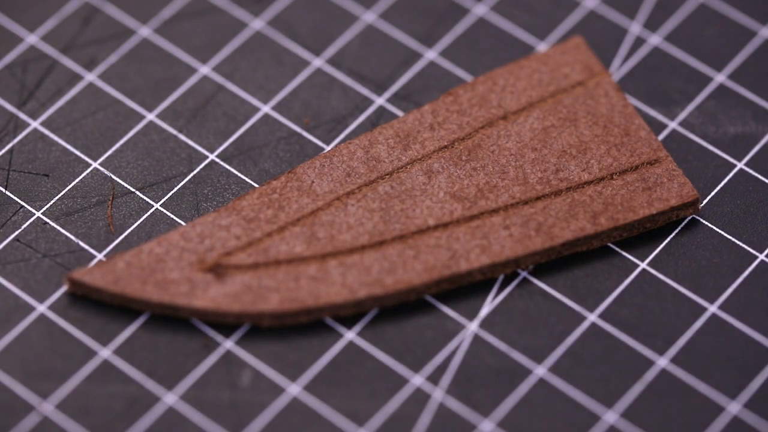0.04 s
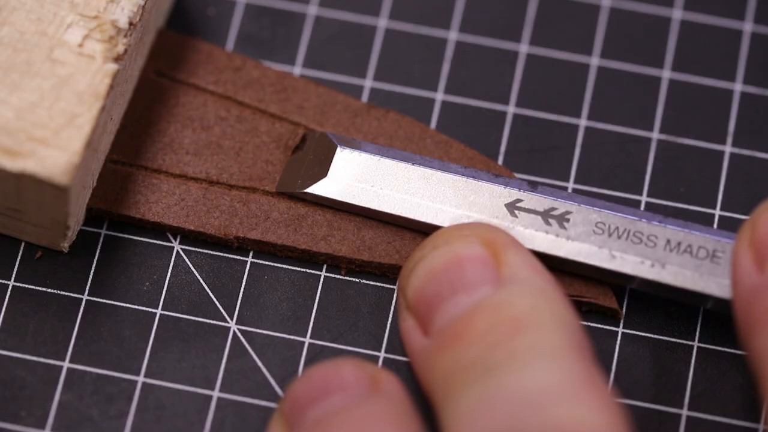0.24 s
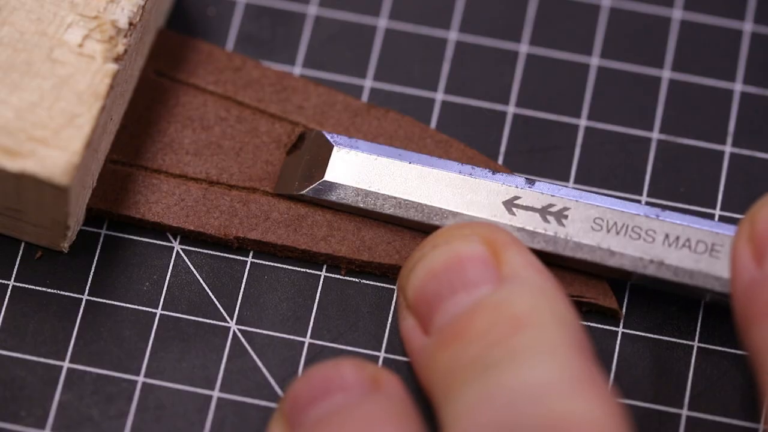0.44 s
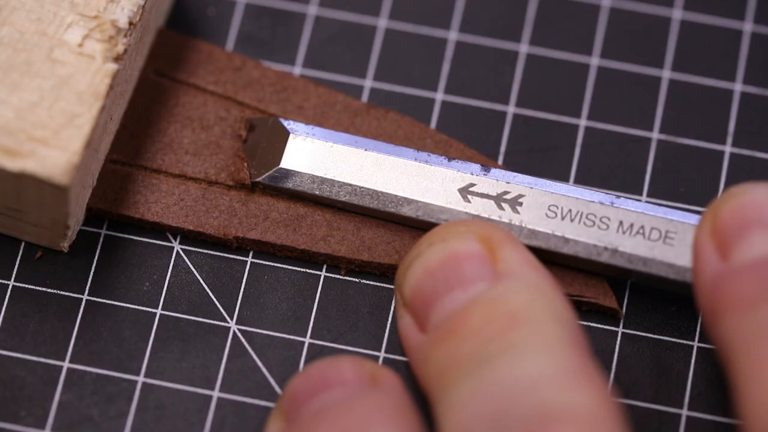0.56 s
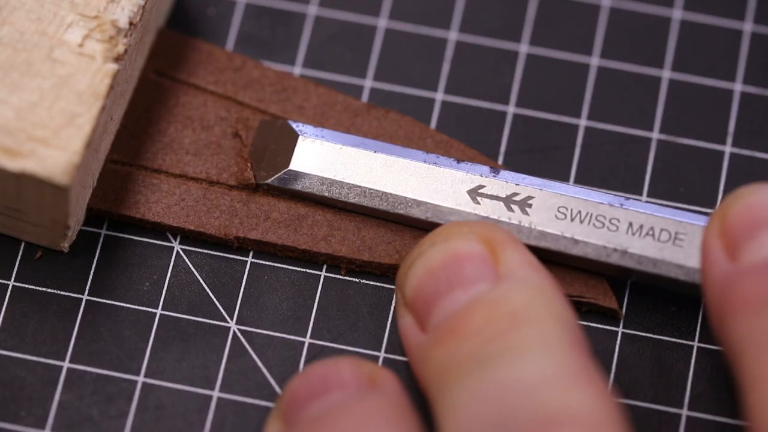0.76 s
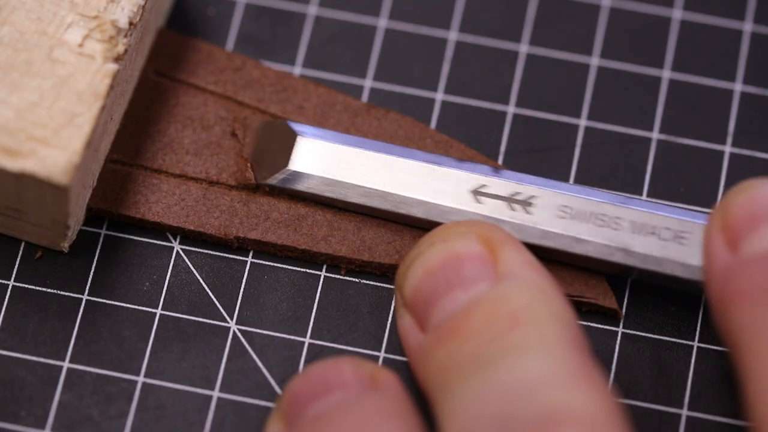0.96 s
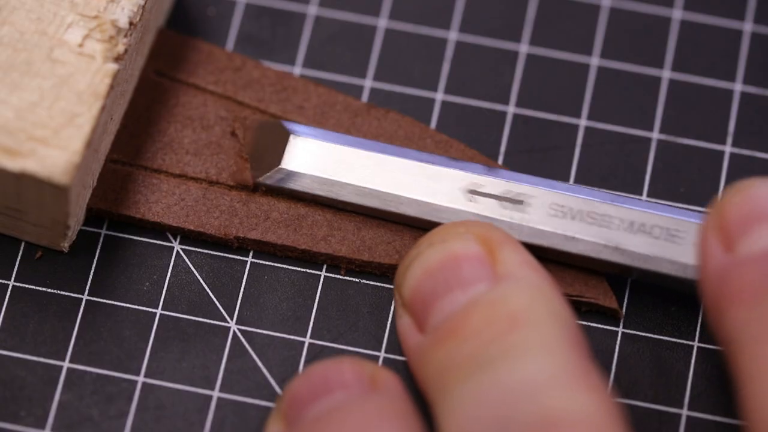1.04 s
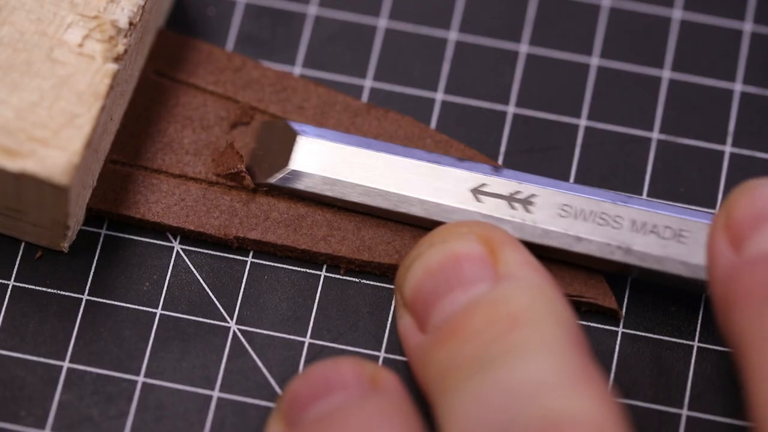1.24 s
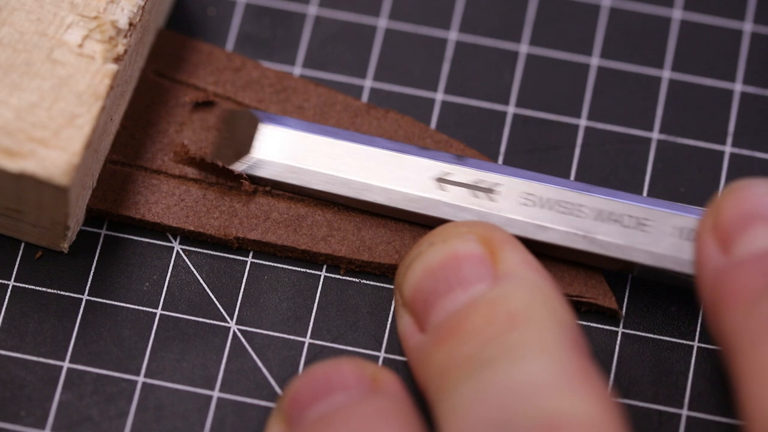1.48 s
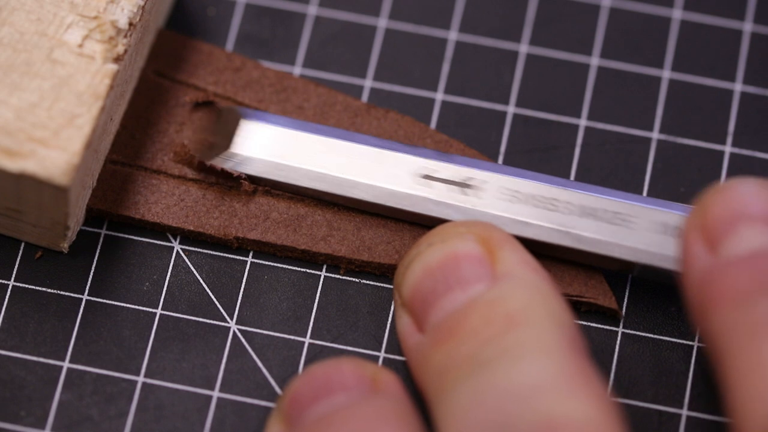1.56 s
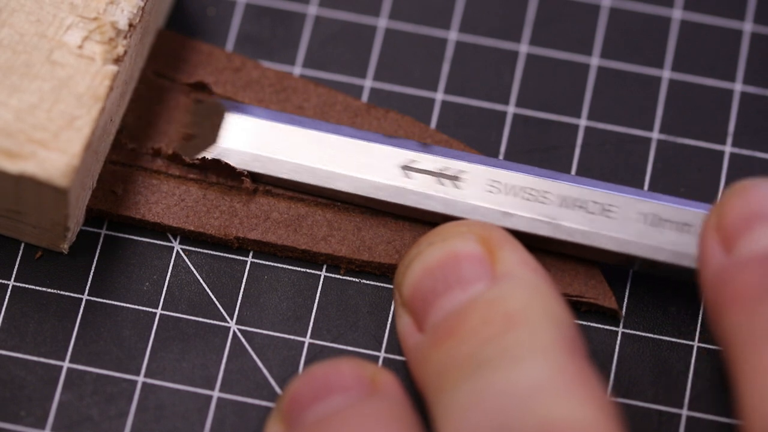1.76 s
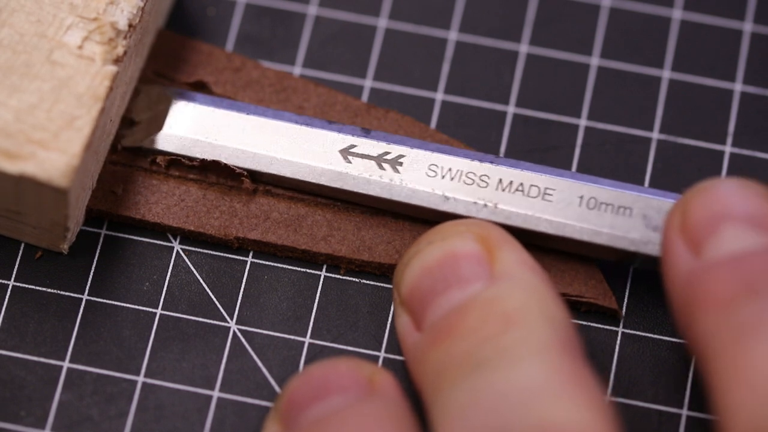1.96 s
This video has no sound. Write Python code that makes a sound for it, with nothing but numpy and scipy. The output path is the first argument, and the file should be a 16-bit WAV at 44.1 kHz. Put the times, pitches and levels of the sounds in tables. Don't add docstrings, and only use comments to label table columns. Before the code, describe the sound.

Close stereo pickup of a steel blade pushed through leather: hands shift and bump the bench, then brief crisp tearing strokes grow stronger, each with a metallic edge and woody thump, over faint room hiss.

```python
import sys
import numpy as np
from scipy import signal
from scipy.fft import rfft, irfft, next_fast_len
from scipy.io import wavfile
from scipy.ndimage import uniform_filter1d

SR = 44100
rng = np.random.default_rng(int(sys.argv[2]) if len(sys.argv) > 2 else 0)


def undo_db(level):
    steps = np.asarray(level, float) / 20
    return 10 ** steps


def put_to_file(sound):
    columns = np.atleast_2d(sound).T
    safe = np.clip(columns, -1, 1)
    whole_steps = np.round(safe * 32767)
    wavfile.write(sys.argv[1], SR, whole_steps.astype(np.int16))


N = 88905


def evened(x):
    return x / np.sqrt(np.mean(x ** 2) + 1e-20)


def read(points, hz):
    f, value = np.transpose(points)
    return np.interp(np.log(hz + 1), np.log(f + 1), value)


def colour(x, points):
    db = read([(0, -100)] + list(points), np.fft.rfftfreq(4096, 1 / SR))
    log_gain = np.log(undo_db(np.maximum(db, -100)))
    mirrored = np.r_[log_gain, log_gain[-2:0:-1]]
    answer = np.fft.ifft(np.exp(np.conj(signal.hilbert(mirrored)))).real[:2048]
    return signal.oaconvolve(x, answer / np.linalg.norm(answer))[:len(x)]


def ring(x, hz, width):
    r = np.exp(-np.pi * width / SR)
    turning = signal.lfilter([1], [1, -r * np.exp(2j * np.pi * hz / SR)], x)
    return 2 * np.sqrt(1 - r) * turning.imag * np.sqrt(2)


def soften(x, hz):
    return signal.lfilter(*signal.butter(2, min(hz, SR / 3), fs=SR), x)


def grains(per_s, spread_db):
    chance = rng.random(N)
    size = rng.exponential(1, N)
    sign = rng.choice([-1., 1.], N)
    return evened((chance < per_s / SR) * sign * undo_db(spread_db * np.minimum(size, 4)))


# f/Hz, level/dB per Hz
ROOM_COLOUR = [(12, -48), (20, -8), (76, 5), (441, -10), (479, -31), (551, -10), (1380, -17.5),
               (3010, -20.5), (15600, -27.5)]
# f/Hz, likeness (0 to 1)
ROOM_LIKENESS = [(30, 0.12), (300, 0.61), (3000, 0.12), (15000, 0.05)]


def room():
    room_db, patch_db = -58, 0.091
    hz = np.fft.rfftfreq(1024, 1 / SR)
    a, b, c, d, patches = rng.standard_normal((N // 256 + 5, 513, 5)).T
    patches = uniform_filter1d(patches, 12, axis=0)
    patches = evened(uniform_filter1d(patches, 14, axis=1))
    same = np.clip(read(ROOM_LIKENESS, hz), -1, 1)[:, None]
    left = a + 1j * b
    right = same * left + np.sqrt(1 - same ** 2) * (c + 1j * d)
    z = np.array([left, right]) * undo_db(read(ROOM_COLOUR, hz)[:, None] + patch_db * patches)
    return undo_db(room_db) * evened(signal.istft(z, nperseg=1024, noverlap=768)[1][:, :N])


# t/s, cutting speed level/dB, force into the bench level/dB
PUSHES = [
    [(.625, -71, -43), (.634, -63, -73), (.636, -43.5, -65), (.648, -42, -55), (.688, -37, -38),
     (.708, -39.5, -38.5), (.728, -54, -42)],
    [(1.17, -61, -72), (1.187, -48.5, -69), (1.194, -40.5, -52), (1.205, -58, -27.5), (1.211, -37, -35),
     (1.255, -37, -31.5), (1.28, -54.5, -40)],
    [(1.425, -64, -97), (1.457, -43.5, -45.5), (1.467, -53, -45), (1.473, -34.5, -30.5),
     (1.508, -34.5, -29.5), (1.526, -41.5, -34), (1.555, -88, -41.5)],
    [(1.68, -62, -66), (1.698, -44, -59), (1.703, -46, -39), (1.733, -35.5, -35), (1.74, -34.5, -33),
     (1.78, -38, -35), (1.81, -76, -39.5)],
    [(1.965, -60, -69), (1.985, -50, -48), (2.0, -49.5, -48), (2.016, -45, -31)],
]


def effort(axis):
    t, gain = np.arange(N) / SR, np.zeros(N)
    for push in PUSHES:
        p = np.transpose(push)
        during = np.interp(t, p[0], np.ones(len(push)), 0, 0)
        gain += during * undo_db(np.interp(t, p[0], p[axis]))
    return gain


# f/Hz, level/dB, time to fade by 60 dB t/s
BENCH = [(56.5, -8, 0.5), (96.9, -3, 0.31), (137, 3, 0.15), (199.8, -1, 0.081), (270, -7, 0.11),
         (386.4, -7.5, 0.076), (458.3, -13, 0.18), (538.4, -8, 0.037), (600, -8, 0.024), (804, -12, 0.015),
         (1055, -17.5, 0.2), (1291, -17.5, 0.14)]
# t/s, level/dB
HANDS = [
    (0, -117),
    (.2, -61),
    (.4, -75.5),
    (0.701, -54),
    (.9, -63.5),
    (1.15, -63),
    (1.298, -56),
    (1.65, -70),
    (1.85, -58.5),
    (2.016, -54),
]
# t/s, wooden knock level/dB, tick level/dB, tick f/Hz
KNOCKS = [(.192, -52, -58, 900), (0.264, -53.5, -70, 690), (0.42, -39, -42, 715), (0.435, -71, -52, 2800),
          (.593, -41, -45.5, 526), (.597, -67, -48, 1790), (.694, -35.5, -48.5, 1355),
          (0.849, -49.5, -62, 680), (0.866, -45, -59.5, 3920), (1.063, -52, -85, 600),
          (1.202, -30.5, -41, 766), (1.211, -36.5, -48, 9100), (1.407, -46, -65, 820),
          (1.468, -29.5, -34, 740), (1.506, -32.5, -54, 1930), (1.735, -32, -37, 810),
          (1.776, -35, -59, 1000), (1.925, -39.5, -43, 1550), (1.953, -63, -58, 3560)]


def bench():
    deep_hz, shake_hz, weight_hz, knock_hz = 215, 900, 233, 1300
    shake_db, weight_db, knock_db, knock_spread_db = -4.5, 3.5, 23.0, 3
    high = 1 - 1 / (1 + (np.array(BENCH)[:, :1] / deep_hz) ** 4)
    shakes = soften(grains(650, -1.5) * effort(axis=2), shake_hz) * undo_db(shake_db)
    s, db = np.transpose(HANDS)
    leaning = undo_db(np.interp(np.arange(N) / SR, s, db) + weight_db)
    weight = soften(grains(400, 2.4) * leaning, weight_hz)
    drive = high * shakes + weight
    blow = soften(np.eye(1, 500)[0], knock_hz)
    spread = rng.standard_normal((len(KNOCKS), len(BENCH), 1))
    for (at, db, *_), each in zip(KNOCKS, spread):
        drive[:, round(at * SR):][:, :500] += undo_db(db + knock_db + knock_spread_db * each) * high * blow
    top = np.zeros(N)
    for k, (hz, db, t60) in enumerate(BENCH):
        top += (-1) ** k * undo_db(db) * ring(drive[k], hz, np.log(1000) / np.pi / t60)
    return top


# f/Hz, level/dB per Hz
CRACK_COLOUR = [(300, 4), (700, -3), (3000, -6.5), (6000, -21), (9000, -43)]


def ticks():
    tick_db, tone_db, tone_q, crack_s = 5, -3.5, 4, .01
    x = np.zeros(N)
    fade = undo_db(-60 * np.arange(600) / SR / crack_s)
    cracks = rng.standard_normal((len(KNOCKS), 600)) * fade
    for (at, _, db, hz), crack in zip(KNOCKS, cracks):
        tone = ring(np.eye(1, 600)[0], hz, hz / tone_q) * np.linalg.norm(crack)
        x[round(at * SR):][:600] += undo_db(db + tick_db) * (colour(crack, CRACK_COLOUR) + undo_db(tone_db) * tone)
    return x


# start t/s, length t/s, level/dB
RUBS = [(0.192, 0.056, -56), (0.417, 0.051, -52), (0.601, 0.036, -53.5), (0.854, 0.036, -55.5),
        (0.933, 0.049, -59.5), (0.712, 0.13, -61.5), (1.091, 0.079, -63.5), (1.397, 0.14, -54),
        (1.558, 0.14, -60.5), (1.913, 0.2, -57.5), (1.262, 0.17, -59.5), (1.8, 0.24, -61.5)]
# f/Hz, level/dB per Hz
RUB_COLOUR = [(150, -8.5), (500, 11), (1200, 2.5), (3000, -4.5), (6000, -19), (15000, -31)]


def rubs():
    rise_s = 0.0046
    t, stroke = np.arange(N) / SR, np.zeros(N)
    for start, length, db in RUBS:
        rise = np.clip((t - start) / rise_s, 0, 1)
        fall = np.clip((start + length - t) / length * 2, 0, 1)
        stroke += rise * fall * undo_db(db)
    return colour(grains(5000, 2.5) * stroke, RUB_COLOUR)


# t/s, level/dB, f/Hz
THUDS = [(0.194, -46, 270), (0.218, -41.5, 147), (1.947, -39.5, 257.7), (0.421, -42.5, 254.5),
         (0.455, -39.5, 134.7), (0.597, -41, 129), (0.617, -40.5, 254), (0.695, -33, 288), (.72, -44, 132),
         (0.761, -42, 105), (0.771, -44.5, 270), (0.863, -49, 152), (.953, -46.5, 237.5),
         (0.974, -35.5, 137), (1.06, -49.5, 258), (1.076, -44.5, 137), (1.2, -38, 229), (1.217, -33.5, 128),
         (1.24, -38, 135), (1.307, -36, 133), (1.341, -43, 99.2), (1.775, -32.5, 283.5), (1.463, -35, 256),
         (1.501, -26.5, 141), (1.589, -41.5, 142), (1.737, -31, 270), (1.746, -28.5, 139),
         (1.808, -32.5, 147.5), (1.941, -34, 143.7)]


def thuds():
    swell_s, sag, wobble = 0.011, 0.045, .3
    x, u = np.zeros(N + 6000), np.arange(6000) / SR / swell_s
    swell = u * np.exp(1 - u)
    for at, db, hz in THUDS:
        turns = np.cumsum(hz * (1 + sag * (1 - np.minimum(u, 3)))) / SR
        x[round(at * SR):][:6000] += undo_db(db + 1.5) * swell * np.sin(2 * np.pi * turns)
    return x[:N] * (1 + wobble * evened(soften(rng.standard_normal(N), 60)))


# t/s, peak
# level/dB, f/Hz, rise t/s
SNAGS = [(.42, -50, 3030, 0.0013), (.42, -55, 5680, .001), (.434, -55.5, 5570, 0.0012),
         (.444, -56.5, 2890, 0.0037), (.594, -41, 517, 0.0037), (.849, -49, 740, 0.0016),
         (.866, -43.5, 730, 0.0018), (1.407, -51, 790, 0.0029), (.943, -54.5, 2770, 0.003),
         (1.467, -38, 780, 0.00067), (1.7345, -25, 700, 0.00079), (1.748, -34, 1044, 0.006),
         (1.926, -43, 1520, 0.0019), (1.927, -44.5, 703, 0.0018), (.6405, -55, 3280, .002),
         (.655, -46, 2050, .002), (.6885, -37, 2570, 0.0019), (.694, -37.5, 3074, 0.0024),
         (1.193, -38, 3100, 0.0014), (1.1935, -45.5, 5230, 0.00098), (1.198, -48, 5100, 0.0011),
         (1.2125, -34, 3050, 0.0014), (1.233, -42, 2500, 0.0014), (1.245, -44, 5520, 0.0024),
         (1.457, -40, 3160, 0.0035), (1.474, -45, 5590, .003), (1.504, -30, 2670, 0.0023),
         (1.504, -34, 4270, 0.0024), (1.519, -36.5, 2640, 0.0021), (1.6985, -38, 2600, 0.0023),
         (1.713, -39, 4900, 0.0035), (1.737, -27.5, 2653, .002), (1.742, -36.5, 6010, 0.0017),
         (1.7505, -24.5, 2617, 0.0022), (1.764, -32, 2670, 0.0012), (1.774, -29.5, 2176, 0.0019),
         (1.776, -37.5, 3810, .0015), (1.985, -45, 2530, 0.0023), (2.006, -37, 2597, 0.0058)]


def snags():
    roughness = .6
    x, t = np.zeros(N + 1200), np.arange(1200) / SR
    noises = rng.standard_normal((len(SNAGS), 1200))
    for (at, db, hz, rise), noise in zip(SNAGS, noises):
        rough = 1 + roughness * evened(uniform_filter1d(noise, size=40))
        swell = t / rise * np.exp(1 - t / rise)
        x[round(at * SR):][:1200] += undo_db(db) * swell * rough * np.sin(2 * np.pi * hz * t)
    return x[:N]


def patchy(x):
    patch_db, level_db = 1.5, -4.0
    z = signal.stft(x, nperseg=256)[2]
    patches = uniform_filter1d(rng.standard_normal(z.shape[::-1]), size=3, axis=0)
    patches = evened(uniform_filter1d(patches, size=6, axis=1))
    return signal.istft(z * undo_db(patch_db * patches.T + level_db), nperseg=256)[1][:N]


# blade ring level/dB, ring pitch share, high ring level/dB, top-end level/dB
BITES = [
    (-0.5, .98, -2.5, -1.5),
    (-2.5, 1.01, -9, -2),
    (-3.5, .99, 1.5, 1.5),
    (-8.5, .985, -6, 4.5),
    (0.5, 0.99, -13.5, 6.5),
]


def bite(axis):
    ends = [push[k][0] for push in PUSHES for k in (0, -1)]
    return np.interp(np.arange(N) / SR, ends, np.repeat(np.transpose(BITES)[axis], 2))


def glide(x, hz, width):
    turn = np.exp(2j * np.pi * np.cumsum(hz) / SR)
    r = np.exp(-np.pi * width / SR)
    return 2 * np.sqrt(2 - 2 * r) * (turn * signal.lfilter([1], [1, -r], x / turn)).imag


# f/Hz, level/dB per Hz
FIBRE_COLOUR = [(400, 3), (1000, -2.5), (2000, -3.5), (3200, 2.5), (5700, -6), (6600, -7.5), (14500, -17.5),
                (15800, -19)]
# f/Hz, width f/Hz, level/dB
BLADE_RINGS = [(1640, 20, -18), (2177, 75, -9), (2640, 53, -2.5), (2800, 73, -2), (2950, 124, -3),
               (4200, 51, -20), (4900, 280, -7.5)]


def blade(x, grip):
    rings_db, high_ring_db, top_hz = -2.5, -15, 7000
    x = patchy(x)
    struck = x * grip * undo_db(bite(axis=0))
    rings = sum(undo_db(db) * glide(struck, hz * bite(axis=1), width) for hz, width, db in BLADE_RINGS)
    high_ring = undo_db(high_ring_db) * ring(x * undo_db(bite(axis=2)), 5720, 130)
    crackle = colour(x, FIBRE_COLOUR)
    low = soften(crackle, top_hz)
    return low + undo_db(bite(axis=3)) * (crackle - low) + undo_db(rings_db) * rings + high_ring


# f/Hz, level/dB per Hz
WIDE_COLOUR = [(1000, -14), (4000, -2), (15000, 0)]


def cutting():
    fibres_per_s, spread_db, chatter_db, chatter_s = 12000, 2, 1.5, .0025
    grip_db, grip_power, dull_db, dull_hz, wide_db = -33, .35, -55, 4000, -8
    chatter = evened(uniform_filter1d(rng.standard_normal(N), max(int(chatter_s * SR), 1)))
    speed = effort(axis=1)
    grip = (effort(axis=2) / undo_db(grip_db)) ** grip_power
    bright = speed / (speed + undo_db(dull_db))
    clumps = undo_db(chatter_db * chatter) * speed
    tears = [grains(fibres_per_s, spread_db) * clumps for _ in range(2)]
    near, wide = (blade(bright * x + (1 - bright) * soften(x, dull_hz), grip) for x in tears)
    return near, undo_db(wide_db) * colour(wide, WIDE_COLOUR)


# f/Hz, phase/radians
LEAD = [(0, 0), (1700, .4), (3000, 1.4), (4400, -2.3), (5400, -.4), (7500, -1.4), (15000, -.9)]
# f/Hz, level/dB
SIDE_DB = [(100, .8), (600, 3), (1300, 1), (2600, 3), (15000, 1)]


def ports(x):
    n = next_fast_len(N + 4096)
    hz = np.fft.rfftfreq(n, 1 / SR)
    half = undo_db(read(SIDE_DB, hz) / 2) * np.exp(.5j * read(LEAD, hz))
    return irfft(rfft(x, n) * np.array([half, 1 / half]), n)[:, :N]


# f/Hz, time to fade by 60 dB t/s
TAIL = [(100, 0.73), (600, 0.21), (3000, 0.33), (15000, 0.71)]


def walls(x):
    taps = np.zeros((2, SR // 2))
    at = np.arange(200, SR // 2 - 20, 20) + rng.integers(0, 20, (2, (SR // 2 - 201) // 20))
    np.put_along_axis(taps, at, rng.choice([-1., 1.], at.shape), 1)
    hz, t, z = signal.stft(taps, SR, nperseg=256)
    fade = undo_db(-60 * t / read(TAIL, hz)[:, None])
    tail = signal.istft(z * fade, SR, nperseg=256)[1]
    return signal.fftconvolve(x[None], tail / np.linalg.norm(tail[0]), axes=1)[:, :N]


def scene():
    walls_db = -13
    near, wide = cutting()
    work = near + bench() + thuds() + ticks() + snags() + rubs()
    return ports(work) + np.outer([1, -1], wide) + undo_db(walls_db) * walls(work) + room()


def roll_off(x):
    return signal.sosfilt(signal.butter(12, 15740, fs=SR, output="sos"), x)


def record(dry):
    return roll_off(dry)


dry = scene()
out = record(dry)
put_to_file(out)
```